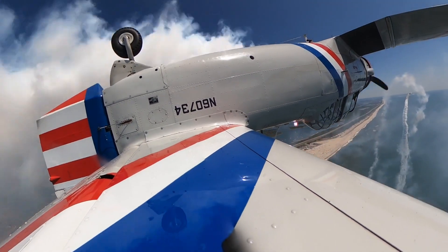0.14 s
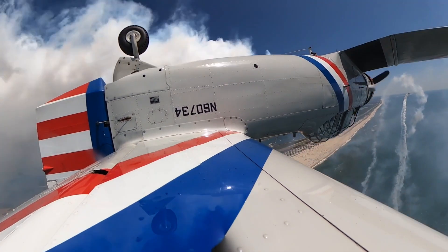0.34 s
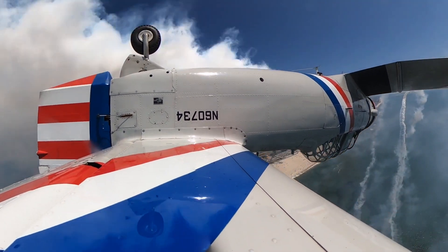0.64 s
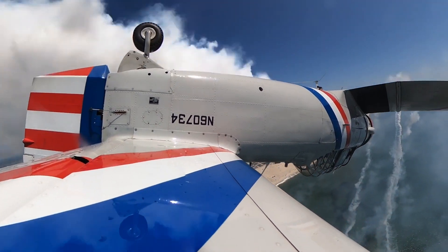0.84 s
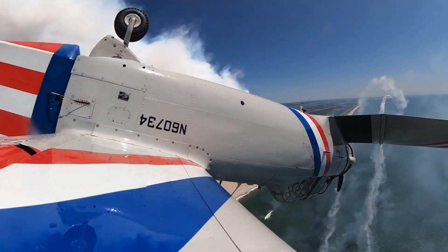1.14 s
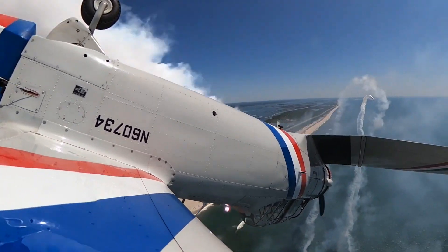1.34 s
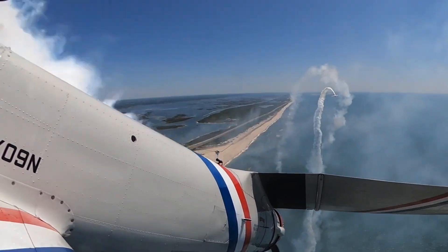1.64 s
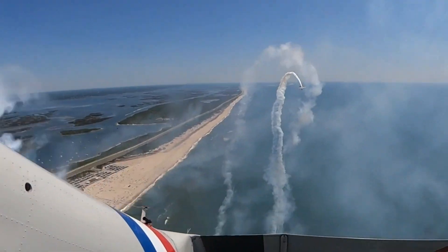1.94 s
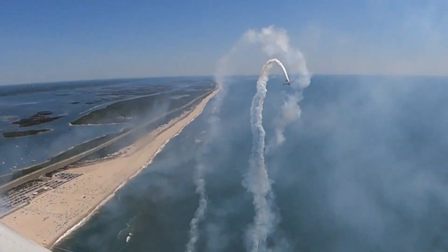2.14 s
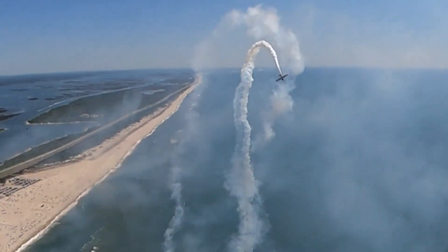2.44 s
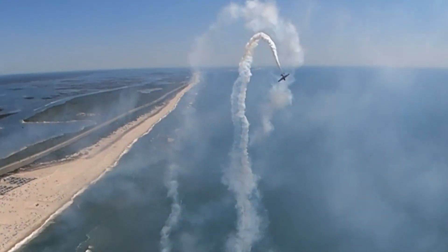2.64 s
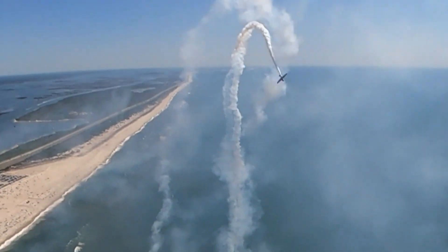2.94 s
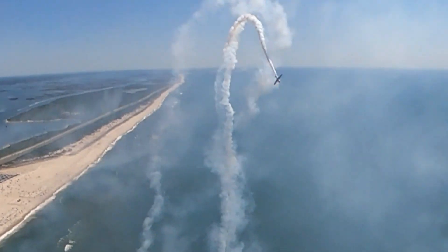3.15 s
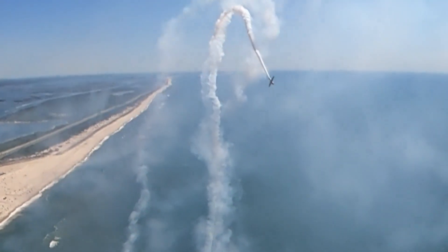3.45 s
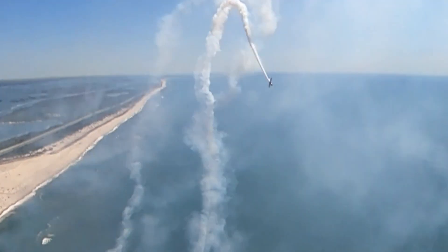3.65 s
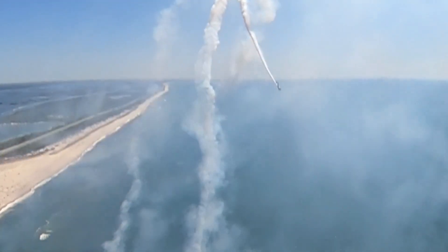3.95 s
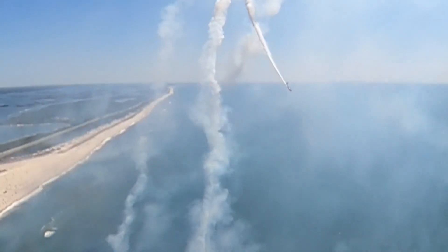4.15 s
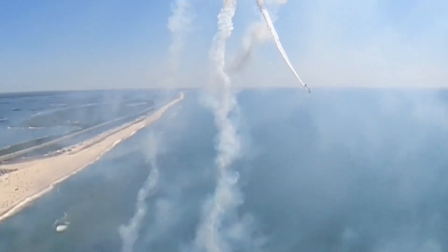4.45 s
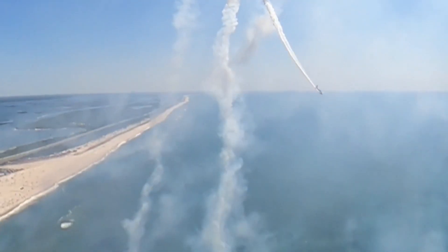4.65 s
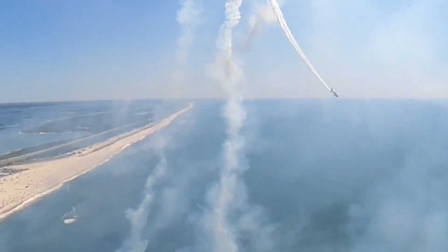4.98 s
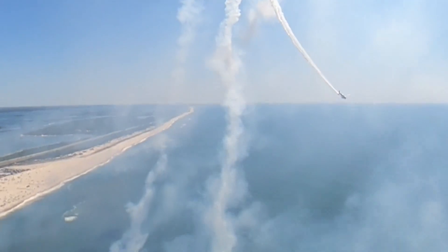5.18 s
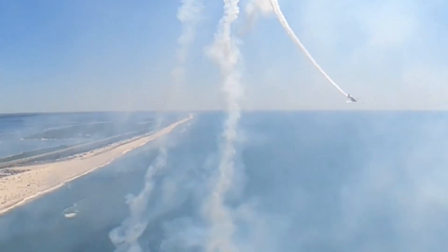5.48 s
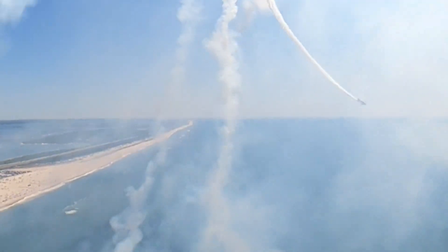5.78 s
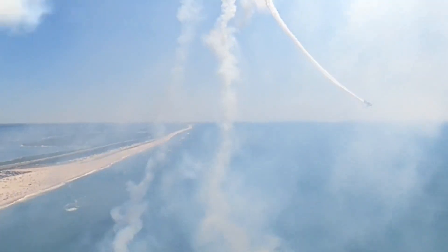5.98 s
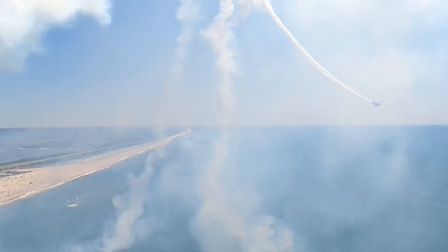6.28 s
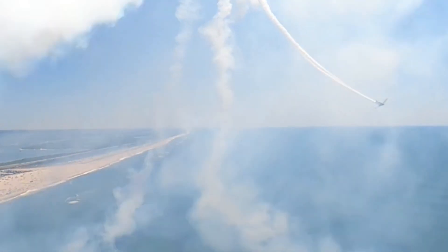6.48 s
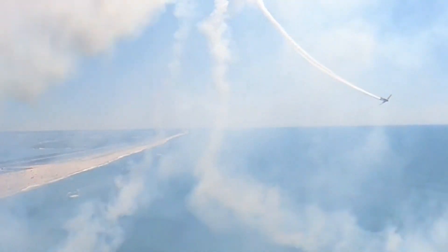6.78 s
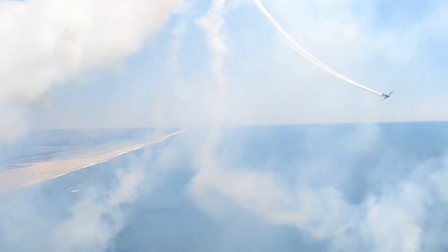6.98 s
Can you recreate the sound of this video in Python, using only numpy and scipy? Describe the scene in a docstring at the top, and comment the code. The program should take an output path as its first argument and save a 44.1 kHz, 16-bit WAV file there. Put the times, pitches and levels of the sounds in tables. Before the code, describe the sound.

Onboard a diving aerobatic plane: deep rough piston drone, buffeting wind growing brighter, and high airflow whistles that jump in pitch and grow piercing.

```python
"""Aerobatic dive from the wing

A camera on the wing of an aerobatic piston airplane hears it come over the top of a loop and dive.
Shaft-locked tones and uneven cylinder puffs make the drone of the nine-cylinder radial and its two-blade propeller.
Coloured noise makes the heavy slipstream, whose rush brightens as the airspeed builds.
Gaps and edges near the camera whistle, rise and jump between modes: wavering tones broken up by loose eddies."""
import sys
import numpy as np
from scipy import signal
from scipy.fft import rfft, irfft, next_fast_len
from scipy.io import wavfile
from scipy.ndimage import uniform_filter1d, minimum_filter1d, map_coordinates

SR = 44100
rng = np.random.default_rng(int(sys.argv[2]) if len(sys.argv) > 2 else 0)


def store_pcm(level_fs):
    """Save levels as 16-bit WAV."""
    pcm = np.round(np.clip(level_fs, -1, 1) * 32767).astype(np.int16)
    wavfile.write(sys.argv[1], SR, np.atleast_2d(pcm).T)


N = 313992


def amp(db):
    """Decibels to gain."""
    return 10 ** (np.asarray(db) / 20)


def unit(x):
    """Scale to rms 1."""
    return x / np.sqrt(np.mean(x ** 2) + 1e-20)


def curves(rows):
    """One value per sample for each column after the time."""
    times, *columns = np.transpose(rows)
    return [np.interp(np.arange(N) / SR, times, column) for column in columns]


def wobble(rate):
    """A smooth random curve, rate knots a second."""
    knots = rng.standard_normal(int(N * rate / SR) + 4)
    return map_coordinates(knots, [np.arange(N) * rate / SR])


def eddies(rate):
    """Random swings of strength and phase, rate a second."""
    return wobble(rate) + 1j * wobble(rate)


def filtered(x, response):
    """x through a response given as a function of frequency."""
    size = next_fast_len(N + 8192)
    return irfft(rfft(x, size) * response(np.fft.rfftfreq(size, 1 / SR)), size)[:N]


def coloured(x, spectrum):
    """x through (f/Hz, level/dB) points on a log axis, at rms 1; silent above the last point."""
    f, db = np.transpose(spectrum)

    def response(hz):
        """Gain read off the spectrum."""
        return amp(np.interp(np.log(hz + 1), np.log(f + 1), db, right=-np.inf))

    return unit(filtered(x, response))


def turbulence(spectrum, patchy_db):
    """Noise of rms 1 in which passing eddies lift patches of the spectrum."""
    cells = signal.stft(rng.standard_normal(N), nperseg=512)[2]
    patches = uniform_filter1d(rng.standard_normal(cells.shape), size=6, axis=0)  # across frequency
    patches = uniform_filter1d(patches, size=12, axis=1)  # across time
    noise = signal.istft(cells * amp(patchy_db * unit(patches)), nperseg=512)[1][:N]
    return coloured(noise, spectrum)


def by_airspeed(speed, ends_db, bend=1):
    """Gain of a layer between its slow and its fast level."""
    slow_db, fast_db = ends_db
    return amp(slow_db + (fast_db - slow_db) * speed ** bend)


def plateau(start, end, ramp, height):
    """A lift that ramps up, holds and ramps down."""
    return curves([(start - ramp, 0), (start, height), (end, height), (end + ramp, 0)])[0]


def gliding_tone(rows):
    """Pitch and level along a curve, silent outside it."""
    times, hz, db = np.transpose(rows)
    t = np.arange(N) / SR
    return np.interp(t, times, hz), np.interp(t, times, db, left=-np.inf, right=-np.inf)


FADE_DB = 20  # fall per attack time before the hold, and per release time after it


def held_tone(row, unlock=0):
    """Pitch and level of a tone that fades in, holds and fades out as its pitch drifts; unlock in Hz/s2."""
    start, end, attack, release, hz, rise, db = row
    t = np.arange(N) / SR
    before, after = np.maximum(start - t, 0), np.maximum(t - end, 0)
    pitch = hz + rise * (t - start) + unlock * after ** 2
    return pitch, db - FADE_DB * (before / attack + after / release)


def air_tone(hz, db, waver_hz, loose, rate, octave_db):
    """A flow-driven tone locked to a resonance; loose eddies, a little flat of it, beat against it and break it up."""
    t = np.arange(N) / SR
    phase = 2 * np.pi * np.cumsum(hz + waver_hz * wobble(rate / 5)) / SR
    flat = eddies(rate) * np.exp(-2j * np.pi * .15 * rate * t)
    tone = (1 + loose * flat) / np.sqrt(1 + 2 * loose ** 2) * np.exp(1j * phase)
    octave = amp(octave_db) * tone ** 2
    return amp(db) * unit(np.real(tone + octave))


# how firmly an edge tone locks: (its level/dB, share of loose eddies)
LOOSENESS = [(-50, .5), (-40, .3), (-32, .14), (-25, .07)]
WHISTLE_TRIM_DB = -2.5  # added to the steady, low and high edge whistles


def edge_tone(hz, db, octave_db=-44, choppy=1):
    """A whistle that is smooth when blown hard, choppy and smeared when weak."""
    loose = choppy * np.interp(db, *np.transpose(LOOSENESS))
    return air_tone(hz, db, waver_hz=16 * loose, loose=loose, rate=85, octave_db=octave_db)


def shaft_tone(turns, multiple, waver_db):
    """A line of rms 1 locked to the crankshaft."""
    line = np.sin(2 * np.pi * (multiple * turns + rng.random()))
    return unit(amp(waver_db * wobble(4.0)) * line)


# passing swells of the propeller's tones: (from t/s, until t/s, multiple of the shaft speed, lift/dB)
SWELLS = [(1.357, 1.686, 1, 8.5), (1.803, 2.05, 2, 5), (2.555, 2.922, 2, 9), (5.203, 5.72, 2, 2),
          (6.5, 7.1, 2, 6.5)]


def swell(multiple):
    """Gain of the passing swells on one propeller tone."""
    lifts = [plateau(start, end, .032, db) for start, end, k, db in SWELLS if k == multiple]
    return amp(sum(lifts))


# once-a-turn shake and blade passing, before their swells: (level/dB at the top of the loop, level/dB in the full dive)
SHAKE_DB = (-13.5, -29.5)
BLADE_DB = (-31, -16)


def propeller(turns, speed):
    """The airframe shakes once a turn, most when slow; two blades pass in each turn, louder when fast."""
    shake = swell(1) * shaft_tone(turns, 1, waver_db=1)
    blades = swell(2) * shaft_tone(turns, 2, waver_db=1)
    return by_airspeed(speed, SHAKE_DB, bend=2.7) * shake + by_airspeed(speed, BLADE_DB, bend=0.27) * blades


# engine drone before DRONE_DB: (multiple of the shaft speed, level/dB); 4.5 is the firing rate
ORDERS = [(3, -31.5), (3.5, -31.5), (4, -27.5), (4.5, -27.5), (5.5, -27), (7, -36), (8, -30.5), (10, -44),
          (10.5, -40)]
# tone of the exhaust stack: (f/Hz, relative level/dB)
STACK = [(40, -27), (110, -4.5), (300, 0.5), (430, -3), (560, -11), (750, -27.5), (1200, -44), (3000, -52),
         (8000, -84)]
# drone gain and exhaust level: (level/dB at the top of the loop, level/dB in the full dive)
DRONE_DB = (0, -4)
EXHAUST_DB = (-26.5, -28.5)


def engine(turns, speed, uneven=0.23, scatter=0.6):
    """Nine cylinders fire in two turns, each with its own strength, over the drone of the strong orders."""
    cylinders = 9
    firings = np.flatnonzero(np.diff(np.floor(turns * cylinders / 2)))
    which = np.arange(len(firings)) % cylinders
    strengths = 1 + uneven * unit(rng.standard_normal(cylinders))[which]
    strengths = strengths + scatter * rng.standard_normal(len(firings))
    # each cylinder's puff takes its own path round the collector ring, up to 5 ms long
    paths = rng.integers(0, SR // 200, cylinders)
    puffs = np.bincount(firings + paths[which], strengths, N)[:N]
    exhaust = coloured(puffs, STACK)
    drone = sum(amp(db) * shaft_tone(turns, multiple, waver_db=1.5) for multiple, db in ORDERS)
    return by_airspeed(speed, DRONE_DB, bend=1.3) * drone + by_airspeed(speed, EXHAUST_DB, bend=1.8) * exhaust


# spectra of the slipstream's bands, low to high: (f/Hz, relative level/dB per Hz)
BUFFET = [(3, -15), (12, 5.5), (28, 2.5), (50, 5), (90, -11.5), (250, -40)]
ROAR = [(10, -24), (35, -5), (60, 5.5), (105, 2), (180, -2.5), (240, -4), (300, -6), (400, -13.5),
        (550, -18), (800, -36.5), (2000, -78)]
RUSH = [(150, -33), (350, 0.5), (550, 5), (800, 3), (1200, -3), (2000, -12.5), (3000, -42), (5000, -41),
        (9000, -67)]
HISS = [(700, -19), (2000, -3.5), (2800, 1), (3900, -2), (5000, -8), (6500, -11), (7300, -15.5),
        (8300, -18), (9500, -26), (11200, -30), (12500, -35.5), (14500, -64)]
SIZZLE = [(2500, -12), (4000, -3), (4700, -6.5), (6000, -15.5), (9000, -49)]
# their levels before gust and pulsing: (level/dB at the top of the loop, level/dB in the full dive)
BUFFET_DB = (-16, -23)  # dies away as the flow straightens
ROAR_DB = (-18.5, -12.5)
RUSH_DB = (-38, -25.5)
HISS_DB = (-40.5, -35.5)
SIZZLE_DB = (-61, -38.5)  # a sharper hiss that joins in the dive
# a gust over the camera lifts all but the buffet: (from t/s, until t/s, ramp/s, lift/dB)
GUST = (3.36, 3.4, 0.88, 1.43)


def slipstream(turns, speed, throb=0.036):
    """Turbulent noise: buffet on the housing, roar round the wing, and a rush and hiss that grow with airspeed."""
    buffet = by_airspeed(speed, BUFFET_DB, bend=4.0) * turbulence(BUFFET, patchy_db=-2.5)
    roar = by_airspeed(speed, ROAR_DB, bend=1.11) * turbulence(ROAR, patchy_db=1.5)
    rush = by_airspeed(speed, RUSH_DB, bend=0.79) * turbulence(RUSH, patchy_db=0.23)
    hiss = by_airspeed(speed, HISS_DB, bend=1.12) * turbulence(HISS, patchy_db=.5)
    sizzle = by_airspeed(speed, SIZZLE_DB, bend=2.5) * turbulence(SIZZLE, patchy_db=0.0)
    pulsing = 1 + throb * np.sin(2 * np.pi * turns)  # the hiss pulses once each turn of the shaft
    return buffet + amp(plateau(*GUST)) * (roar + rush + (hiss + sizzle) * pulsing)


# airframe hums: (held from t/s, until t/s, attack/s, release/s, f/Hz, rise/Hz per s, level/dB)
HUMS = [(.9, 5.86, 11, .7, 268.1, 0.86, -26.5), (6.75, 7.12, 0.5, .1, 215.6, 16, -21),
        (7, 8.1, 0.22, .1, 269.3, -1, -24.5)]


def airframe_hums():
    """Low, fairly steady hums of the wing and camera mount in the airflow."""
    return sum(air_tone(*held_tone(row), waver_hz=0.457, loose=0.23, rate=10, octave_db=-44) for row in HUMS)


# steadier edge tones, one row each time a mode locks, levels before the trim:
# (held from t/s, until t/s, attack/s, release/s, f/Hz, rise/Hz per s, level/dB)
STEADY_WHISTLES = [(.7, 1.55, 4, 1.5, 2622, 28, -48.5), (2.05, 2.55, .4, .6, 2667, 55, -44.5),
                   (2.68, 3.5, .1, .7, 3760, 44, -32.7), (2.85, 3.2, .2, .2, 3396, 45, -43),
                   (3.38, 3.8, .35, .5, 3418, 125, -38.7)]


def steady_whistles():
    """Edge tones that lock for a while; as each lets go it slides up ever faster."""
    tones = [held_tone(row, unlock=110) for row in STEADY_WHISTLES]
    return amp(WHISTLE_TRIM_DB) * sum(edge_tone(hz, db, choppy=.95) for hz, db in tones)


# lower whistle as the dive begins, jumping to a higher mode, before the trim: (t/s, f/Hz, level/dB)
LOW_WHISTLE = [(.5, 2720, -52), (1.05, 2875, -43), (1.58, 2965, -39), (1.68, 2980, -37),
               (1.72, 2984, -31.5), (1.945, 2998, -30), (1.97, 3048, -35), (2.08, 3058, -32),
               (2.36, 3072, -31), (2.6, 3108, -36.5), (2.75, 3145, -46), (3.1, 3200, -56)]


def low_whistle(speed):
    """A climbing edge tone, a loose cluster until the flow picks up."""
    frayed = np.interp(speed, [.06, .1], [1.5, 1])
    return amp(WHISTLE_TRIM_DB) * edge_tone(*gliding_tone(LOW_WHISTLE), choppy=frayed)


# higher whistle as the dive begins, jumping between modes, before the trim: (t/s, f/Hz, level/dB)
HIGH_WHISTLE = [(.5, 3180, -52), (1.1, 3250, -50), (1.55, 3375, -49), (1.72, 3412, -41), (2.03, 3445, -40),
                (2.15, 3466, -36.5), (2.35, 3485, -34), (2.44, 3550, -31.5), (2.49, 3512, -31),
                (2.52, 3578, -25.5), (2.61, 3595, -24), (2.67, 3597, -30), (2.79, 3606, -30.5),
                (2.84, 3610, -48), (3.1, 3610, -56)]


def high_whistle():
    """A second edge tone that climbs above the first as air blows across the gaps near the camera."""
    return amp(WHISTLE_TRIM_DB) * edge_tone(*gliding_tone(HIGH_WHISTLE), choppy=.95)


# vortices shed by the mount: (held from t/s, until t/s, attack/s, release/s, f/Hz, rise/Hz per s, level/dB)
SHEDDING = [(1.95, 2.45, 0.33, .3, 109, 4, -25.5), (3.351, 3.85, .4, 0.24, 118.4, 4, -21.5),
            (4.348, 4.95, .4, 0.37, 104.2, 4, -21), (5.2, 6.6, 1.4, 1, 282.4, 8, -25.5)]


def shed_vortices():
    """Vortices peel off the mount at a rough, wavering rate, so eddies outweigh the steady tone."""
    return sum(air_tone(*held_tone(row), waver_hz=6, loose=1.3, rate=45, octave_db=-41) for row in SHEDDING)


# steady whistle of the dive: (f/Hz and level/dB at full airspeed, Hz lower at no airspeed, bend of that law,
# dB lower at no airspeed, dB gained on locking)
DIVE_WHISTLE = (3437, -32.1, 560, 1.3, 29, 4)


def dive_whistle(speed, start_speed=0.617, lock_speed=0.925):
    """An edge tone that speaks by start_speed, climbs with the airspeed and grows fast as it locks on."""
    hz, db, flat_hz, bend, weaker_db, lock_db = DIVE_WHISTLE
    lack = np.maximum(1 - speed, 0)
    unlocked = np.interp(speed, [lock_speed, 1], [1, 0])
    hush_db = np.interp(speed, [start_speed / 2, start_speed], [40, 0])
    pitch = hz - flat_hz * lack ** bend
    level_db = db - weaker_db * lack - lock_db * unlocked - hush_db
    return edge_tone(pitch, level_db, octave_db=-20.5, choppy=.9)


# unstable edge tone with two close modes, before its trim: (t/s, f/Hz of the upper mode, level/dB of both)
SHRIEK = [(4.15, 2460, -53), (4.55, 2540, -43), (4.85, 2600, -41.5), (4.97, 2695, -39), (5.28, 2700, -41),
          (5.38, 2780, -38), (5.5, 2805, -37), (5.59, 2800, -41), (5.71, 2855, -30.5), (5.95, 2855, -31),
          (5.97, 2830, -39), (6.06, 2858, -30.5), (6.16, 2855, -31), (6.3, 2890, -26.5),
          (6.45, 2890, -26.5), (6.5, 2920, -24.7), (6.79, 2915, -24.7), (6.81, 2950, -22.3),
          (6.93, 2942, -23.7), (6.98, 2915, -25), (7.12, 2938, -24)]
# it slips towards its lower mode, and the two beat: (from t/s, until t/s, added share of the lower mode 0-1)
SLIPS = [(5, 5.3, .4), (5.74, 5.76, .7), (6.22, 6.47, .26), (6.54, 6.57, .45), (6.63, 6.68, .68),
         (6.73, 6.79, .36), (6.955, 6.975, .65), (7.035, 7.06, .75)]
# eddies break it up while it is weak: (its level/dB, share of loose eddies)
SHRIEK_LOOSENESS = [(-40, .8), (-32, .38), (-24, .17)]
SHRIEK_TRIM_DB = -0.6
MODE_GAP_HZ, RESTING_SHARE, SLIP_RAMP_S = 68, .02, .015


def shriek(fray=.13, fray_rate=320, eddy_rate=90, gap_waver_hz=22, waver_hz=13):
    """Two modes share one jet: their beat is flat-topped with narrow dips, and eddies fray it."""
    hz, db = gliding_tone(SHRIEK)
    slips = sum(plateau(start, end, SLIP_RAMP_S, part) for start, end, part in SLIPS)
    share = np.clip(RESTING_SHARE + slips, 0, 1)
    gap_hz = MODE_GAP_HZ + gap_waver_hz * wobble(MODE_GAP_HZ)
    beat = np.exp(-2j * np.pi * np.cumsum(gap_hz) / SR)
    loose = np.interp(db, *np.transpose(SHRIEK_LOOSENESS))
    modes = np.sqrt(1 - share) + np.sqrt(share) * beat
    swing = modes + loose * eddies(eddy_rate) + fray * eddies(fray_rate)
    swing = swing / np.sqrt(1 + 2 * loose ** 2)
    saturated = swing / np.sqrt(1 + np.abs(swing / 2) ** 2)  # flattens the tops of the beat
    upper = np.exp(2j * np.pi * np.cumsum(hz + waver_hz * wobble(eddy_rate / 2)) / SR)
    return amp(SHRIEK_TRIM_DB) * amp(db) * unit(np.real(saturated * upper))


# crankshaft: (t/s, turns per second)
SHAFT = [(0, 34.3), (1.8, 35.05), (3.2, 35.66), (4, 35.76), (7.12, 35.55)]
# airspeed, the main control of the flow: (t/s, 0 at the top of the loop to 1 in the full dive)
AIRSPEED = [(0, 0), (1.8, .1), (3, .45), (4.2, .6), (4.8, .74), (5.7, .93), (6.8, 1), (7.12, 1)]


def scene():
    """Engine and propeller under the slipstream, with the tones that it excites."""
    turns = np.cumsum(curves(SHAFT)[0]) / SR
    speed, = curves(AIRSPEED)
    machine = propeller(turns, speed) + engine(turns, speed)
    air = slipstream(turns, speed) + airframe_hums() + shed_vortices()
    whistles = steady_whistles() + low_whistle(speed) + high_whistle() + dive_whistle(speed)
    return (machine + air + whistles + shriek())[None]


# the camera turns down surges of wind in the bass: (crossover f/Hz, threshold level/dB, share of the excess removed)
WIND_GUARD = (150, -20, .65)


def wind_guard(x):
    """Compress the bass wherever its level passes the threshold."""
    hz, threshold_db, share = WIND_GUARD
    bass = filtered(x, lambda f: 1 / (1 + (f / hz) ** 4))
    power = np.abs(uniform_filter1d(uniform_filter1d(bass ** 2, size=3000), size=2000))
    excess = np.maximum(np.sqrt(power) / amp(threshold_db), 1)
    return x + bass * (excess ** -share - 1)


TOP_HZ = 15000  # band limit


def record(dry, ceiling=0.72):
    """The camera evens out the bass and limits the peaks; nothing is kept above its band limit."""
    x = wind_guard(dry[0])
    needed = np.minimum(1, ceiling / (np.abs(x) + 1e-9))
    gain = uniform_filter1d(minimum_filter1d(needed, size=600), size=400)
    return filtered(x * gain, lambda hz: hz < TOP_HZ)[None]


dry = scene()
out = record(dry)
store_pcm(out)
```